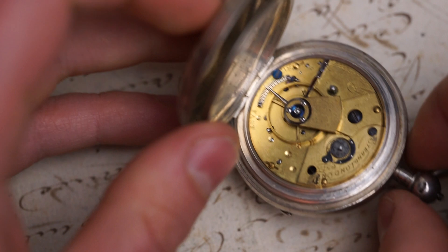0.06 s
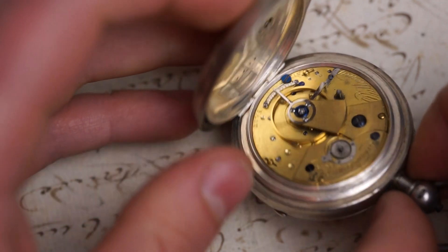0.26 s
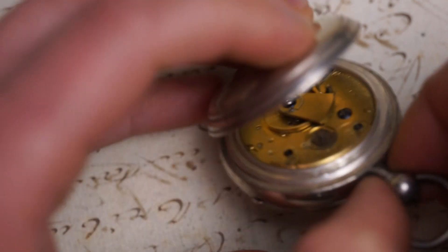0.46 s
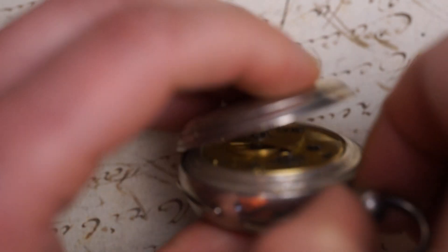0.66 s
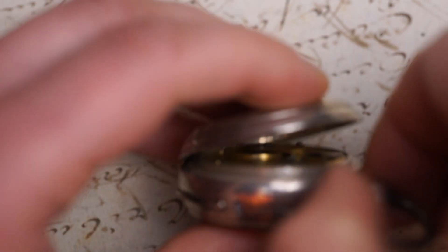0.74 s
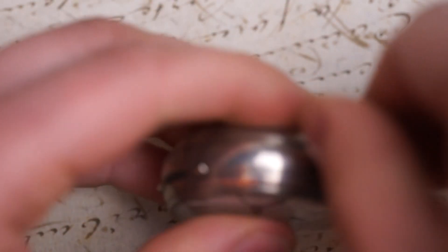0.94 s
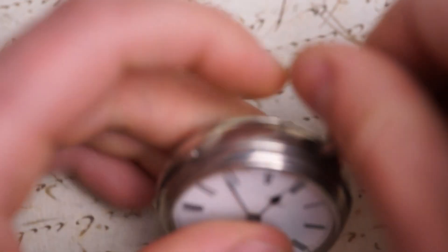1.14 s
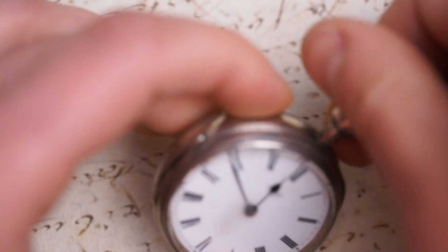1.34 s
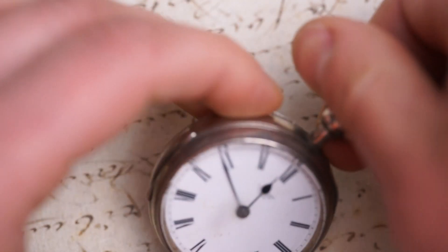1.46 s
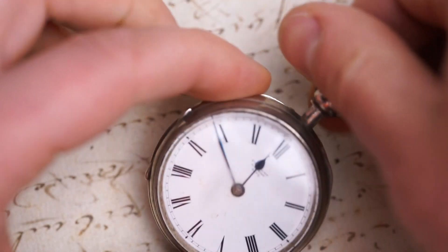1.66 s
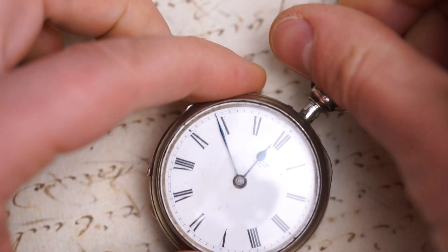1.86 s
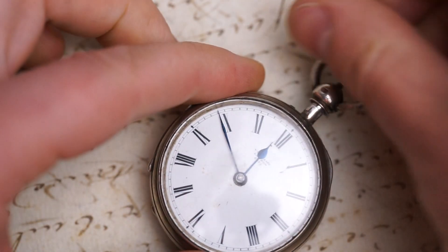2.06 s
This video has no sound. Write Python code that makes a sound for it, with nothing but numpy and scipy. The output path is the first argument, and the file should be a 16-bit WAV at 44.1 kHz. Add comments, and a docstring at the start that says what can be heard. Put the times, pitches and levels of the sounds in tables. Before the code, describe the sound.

A metal pocket watch case snaps shut sharply, then knocks and ticks softly in a quiet room

```python
"""A pocket watch lies open on a paper-covered table in a quiet room and ticks about four times a second:
each beat is a rattle of contacts that excites the resonances of the movement's plates.
Its metal case snaps once, ringing its modes, then knocks on the table as damped modes and cracks.
Fingers rub it while it is closed and turned (noise of many slips), with small dry clicks (noise bursts).
Two low tones waver under the room noise; a close pair of microphones listens."""
import sys
import numpy as np
from scipy import signal
from scipy.fft import rfft, irfft
from scipy.io import wavfile

SR = 44100
rng = np.random.default_rng(int(sys.argv[2]) if len(sys.argv) > 2 else 0)


def unload_audio(sound):
    """Save the sound as a 16-bit wav file, at the path given as the first command line argument."""
    columns = np.transpose(np.atleast_2d(sound))
    # keep every value between -1 and 1, then stretch to whole-number steps
    steps = np.round(np.clip(columns, -1, 1) * 32767)
    wavfile.write(sys.argv[1], SR, steps.astype(np.int16))


def gain_from_decibels(decibels):
    """Convert decibel values to linear amplitude factors."""
    exponent = np.asarray(decibels, float) / 20
    return 10 ** exponent


N = 92610   # samples
EDGES = np.geomspace(20, 20890, 29)   # edges of roughly third-octave bands, Hz


def rms_one(x):
    """Normalisation: scales a signal to unit root-mean-square."""
    return x / np.sqrt(np.mean(x ** 2) + 1e-20)


def at_hz(points, hz):
    """Interpolation along a logarithmic frequency axis."""
    point_hz, value = np.transpose(points)
    return np.interp(np.log(hz), np.log(point_hz), value)


def band(x, low_hz, high_hz):
    """Band-pass filtering with a Butterworth response."""
    sos = signal.butter(2, [low_hz, min(high_hz, SR / 2.1)], "band", fs=SR, output="sos")
    return signal.sosfilt(sos, x)


def coloured(white, spectrum):
    """Spectral shaping by bands: each has its own level, and neighbours use independent noise."""
    bands = []
    for k, (low, high) in enumerate(zip(EDGES, EDGES[1:])):
        bands.append(gain_from_decibels(at_hz(spectrum, np.sqrt(low * high))) * band(white[k % 2], low, high))
    return bands


def impulses(times_s, sizes):
    """Impulsive excitation: one sample per contact."""
    out = np.full(N, 1e-18)
    np.add.at(out, (np.asarray(times_s) * SR).astype(int), sizes)
    return out


def ring(times_s, sizes, hz, t60):
    """Modal resonance: impulses drive a two-pole resonator, which decays exponentially."""
    radius = gain_from_decibels(-60 / (max(t60, .002) * SR))
    angle = 2 * np.pi * hz / SR
    return signal.lfilter([.5, 0, -.5], [1, -2 * radius * np.cos(angle), radius ** 2],
                          impulses(times_s, sizes))


def dying_away(times_s, sizes, t60):
    """Exponential decay: each contact starts an envelope that falls 60 dB in t60 seconds."""
    return signal.lfilter([1], [1, -gain_from_decibels(-60 / (t60 * SR))], impulses(times_s, sizes))


def burst(start_s, level_db, hz, t60):
    """Transient noise: a band around one pitch starts at once and decays exponentially."""
    t = np.arange(N) / SR
    half_width = 2 ** 0.77   # 0.77 octaves to either side
    grit = rms_one(band(rng.standard_normal(N), hz / half_width, hz * half_width))
    return gain_from_decibels(level_db - 60 * np.maximum(t - start_s, 0) / t60) * (t >= start_s) * grit


# Slow swells of the two low tones: time_s, upper_rms_db, lower_rms_db
HUM_SWELLS = [(0.0, -80, -72), (0.1, -62, -59.5), (0.12, -62.5, -69), (0.22, -46.5, -53.5),
              (0.3, -54.5, -78), (0.33, -55.5, -58), (0.43, -72, -65), (0.47, -64, -58), (0.54, -56, -82),
              (0.61, -82, -99), (0.98, -67, -66), (1.02, -72.5, -77), (1.12, -89, -65.5),
              (1.41, -80, -63.5), (1.44, -77, -91), (1.58, -82, -80), (1.61, -105, -80), (1.69, -47, -70),
              (1.77, -79, -61), (1.88, -66, -71), (1.92, -75.5, -83), (1.95, -54, -64), (2.04, -75, -61),
              (2.1, -61, -67)]
# Nominal pitches of the upper and lower tone: pitch_hz
HUM_PITCHES = [128, 102]


def hum():
    """Narrow-band phase modulation blurs two low tones, which swell and fade independently."""
    wander_width_hz, wander_rms_rad = 2.44, 1.23
    time_s, *levels_db = np.transpose(HUM_SWELLS)
    t = np.arange(N) / SR
    pole = np.exp(-np.pi * wander_width_hz / SR)
    out = 0
    for hz, level_db in zip(HUM_PITCHES, levels_db):
        # two equal poles smooth the noise; its first half lets them settle
        wander = signal.lfilter([1], [1, -2 * pole, pole * pole], rng.standard_normal(2 * N))[N:]
        tone = np.sin(2 * np.pi * hz * t + wander_rms_rad * rms_one(wander))
        out = out + np.sqrt(2) * gain_from_decibels(np.interp(t, time_s, level_db)) * tone
    return out


# Spectrum of the room and microphone noise: frequency_hz, relative_density_db (dB per Hz)
AIR_SPECTRUM = [(18, -37), (30, -7), (109, -4), (162, -9), (254, -8.5), (331, -9.5), (408, -12.5),
                (855, -18), (1030, -18), (1370, -20.5), (5420, -23.5), (12600, -26), (15200, -28),
                (18000, -26.5)]
# Left-right correlation of that noise: frequency_hz, correlation (1 = alike)
AIR_LIKENESS = [(60, 0.98), (180, 0.96), (550, 0.46), (1650, 0.086), (4970, 0.07), (15000, 0.068)]


def air():
    """Partial coherence: mid and side noises, weighted by band, set how alike left and right are."""
    bands = coloured(rng.standard_normal((2, 2, N + SR // 2)), AIR_SPECTRUM)
    alike = np.clip(at_hz(AIR_LIKENESS, np.sqrt(EDGES[1:] * EDGES[:-1])), -1, 1)
    out = 0
    for likeness, (mid, side) in zip(alike, bands):
        common = np.sqrt(1 + likeness) * mid[-N:]
        opposed = np.sqrt(1 - likeness) * side[-N:] * [[1], [-1]]
        out = out + common + opposed
    return gain_from_decibels(-57) * rms_one(out)


# Skin slides over metal: start_s, rise_s, fall_t60_s, level_db, centre_hz
RUB_SLIDES = [(.06, 0.075, 0.33, -63, 2140), (0.487, 0.027, 0.34, -57, 2000),
              (1.128, 0.066, 0.22, -52.5, 4100), (1.13, 0.057, 0.25, -54, 10500)]


def rubs():
    """Stick-slip friction: dense uneven slips in a broad band swell, then decay exponentially."""
    slips_per_s, slip_spread_db, half_width_octaves = 8000, 2, 1
    t, out = np.arange(N) / SR, 0
    for start_s, rise_s, t60, level_db, hz in RUB_SLIDES:
        happens = rng.random((2, N)) < slips_per_s / SR
        direction = rng.choice([-1, 1], (2, N))
        sizes = gain_from_decibels(slip_spread_db * np.minimum(rng.exponential(1, (2, N)), 4))
        slips = happens * direction * sizes
        shared = slips + 0.28 * slips[::-1]   # some of each side reaches the other
        noise = band(shared, hz / 2 ** half_width_octaves, hz * 2 ** half_width_octaves)
        rise = np.clip((t - start_s) / rise_s, 0, 1)
        fall = gain_from_decibels(-60 * np.maximum(t - start_s - rise_s, 0) / t60)
        out = out + gain_from_decibels(level_db) * rise * fall * rms_one(noise)
    return out


# Reverberation time of the room: frequency_hz, t60_s
ROOM_DECAY = [(500, 0.54), (1500, 0.23), (3000, 0.26), (8000, 0.34), (15000, 0.26)]


def room(x):
    """Diffuse reverberation: convolution with noise that decays band by band, its own on each side."""
    level_db, tail_rise_s = -7, 0.0025
    t, tail = np.arange(SR // 2) / SR, 0
    white = rng.standard_normal((2, 2, len(t)))
    for k, (low, high) in enumerate(zip(EDGES[9::2], EDGES[11::2])):
        decay = gain_from_decibels(-60 * t / at_hz(ROOM_DECAY, np.sqrt(low * high)))
        tail = tail + band(white[k % 2], low, high) * decay
    tail = tail * np.clip(t / tail_rise_s, 0, 1) ** 2
    tail = tail / np.sqrt(np.sum(tail ** 2) / 2)   # unit energy per side on average
    return gain_from_decibels(level_db) * signal.fftconvolve(x[None], tail, axes=1)[:, :N]


# Small dry clicks of the handled case: start_s, level_db, centre_hz
CASE_CLICKS = [(.0972, -58.5, 7800), (.3775, -52.5, 5840), (.4200, -59, 5900), (.4788, -51.5, 7840),
               (.7502, -55, 9000), (.7706, -54, 9900), (.8964, -59, 10000), (1.2655, -56, 10060),
               (1.4785, -55.5, 7600), (1.5638, -60, 13700), (1.7639, -56.5, 10400), (1.8961, -62, 5500),
               (1.9220, -56, 4750), (1.9650, -57.5, 13000)]


def clicks():
    """Transient noise: each click is a short burst around its own pitch."""
    return sum(burst(start_s, level_db, hz, t60=0.05) for start_s, level_db, hz in CASE_CLICKS)


# Escapement beats: start_s, level_db (added to the plate and grit levels)
TICK_BEATS = [(0.161, -61.5), (.4020, -61), (.6570, -57.5), (.9103, -61.5), (1.4207, -61.5),
              (1.6932, -61.5), (1.9285, -65)]
# Modes of the movement's plates: pitch_hz, relative_level_db, t60_s
PLATE_MODES = [(4360, -15, .3), (5350, -12.5, .12), (7000, -4.5, .04), (7760, -2.5, 0.05),
               (8880, -10.5, .3), (9620, -5.5, .08), (10400, -6, 0.054), (10930, -5, .1),
               (11080, -6.5, 0.11), (11800, -13, 0.21), (12500, -8, .06), (13100, -11, .06)]


def ticks():
    """Modal excitation: each beat is a fading, gritty rattle of four contacts that rings the plates."""
    rattle_s, fade_db, spread_db = 0.022, 8.5, 3
    start_s, beat_db = np.transpose(TICK_BEATS)
    order = np.linspace(0, 1, 4)   # first to last contact
    times_s = start_s[:, None] + rattle_s * rng.random((len(start_s), 4)) * order
    chance_db = rng.normal(0, spread_db, (len(start_s), 4, len(PLATE_MODES)))
    out = np.zeros(N)
    for k, (hz, mode_db, t60) in enumerate(PLATE_MODES):
        contact_db = beat_db[:, None] + mode_db - fade_db * order + chance_db[..., k]
        out += ring(times_s, gain_from_decibels(contact_db) * (-1) ** k, hz, t60)
    for at_s, level_db in TICK_BEATS:
        out += burst(at_s, level_db + 4, hz=9600, t60=.09)
    return out


# Contacts of the snap: start_s, level_db (added to the mode levels)
SNAP_CONTACTS = [(.2035, -16), (.2038, -12.5), (.2042, -17), (.2046, -17), (0.2078, -28)]
# Modes of the open case: pitch_hz, relative_level_db, t60_s
OPEN_CASE_MODES = [(1070, -30.5, 0.033), (1490, -28, .02), (1824, -26, 0.084), (2208, 0, 0.012),
                   (2934, -7.5, 0.0095), (3030, -11, 0.029), (3215, -12.5, 0.031), (3550, -16.5, 0.014),
                   (4446, -8, 0.012), (4840, -13, 0.02), (4990, -16, 0.03), (5460, -13.5, 0.028),
                   (6800, -19, 0.041), (7220, -16.5, 0.02), (7850, -16, .02), (8230, -11, .015),
                   (8560, -8, 0.071), (9450, -20, .015), (10100, -25, 0.011), (11260, -35, 0.02),
                   (11680, -40, 0.024), (12830, -15.5, 0.012), (12900, -19, 0.006), (15800, -25, 0.0107),
                   (14700, -23, .012)]
# Spectrum of the snap's broad grit: frequency_hz, relative_density_db (dB per Hz)
SNAP_GRIT_SPECTRUM = [(530, -51), (900, -27.5), (2320, 7), (3770, -10), (5000, 7.5), (6130, -14.5),
                      (7200, 5.5), (11700, -6), (13200, -2.5), (16400, -4.5)]


def snap():
    """Modal excitation and stereo delay: quick gritty contacts ring the case; the right leads, louder."""
    grit_db, grit_t60_s = -23, 0.018
    hollow_hz, hollow_q = 3850, 5.0
    right_lag_s, in_step_above_hz, left_over_right_db = -0.000031, 12500, -4
    start_s, contact_db = np.transpose(SNAP_CONTACTS)
    x = np.zeros(N)
    for k, (hz, mode_db, t60) in enumerate(OPEN_CASE_MODES):
        x += ring(start_s, gain_from_decibels(contact_db + mode_db) * (-1) ** k, hz, t60)
    envelope = dying_away(start_s, gain_from_decibels(contact_db - contact_db.max()), grit_t60_s)
    grit = rms_one(sum(coloured(rng.standard_normal((2, N)), SNAP_GRIT_SPECTRUM)))
    x = x + gain_from_decibels(grit_db) * envelope * grit
    left = signal.lfilter(*signal.iirnotch(hollow_hz, hollow_q, SR), x)
    hz = np.arange(N // 2 + 1) * SR / N
    lag_s = right_lag_s / (1 + (hz / in_step_above_hz) ** 10)   # vanishes at the top
    right = irfft(rfft(left) * np.exp(-2j * np.pi * hz * lag_s), N)
    return np.array([left, right]) * gain_from_decibels([[left_over_right_db / 2], [-left_over_right_db / 2]])


# The held case meets table or lid: start_s, level_db (added to the mode levels), centre_hz,
# width_octaves (distance from the centre at which a mode is 10 dB weaker), left_over_right_db
CASE_KNOCKS = [(.5160, -58, 2000, 1.3, -5), (.5444, -65, 3000, 1.4, -4), (.6490, -53, 1800, 0.67, -6),
               (.6565, -39.5, 1960, 1.48, 2), (.9563, -45, 2500, 6.5, 0), (1.1375, -57, 1000, 1.7, 1),
               (1.1860, -51.5, 7000, .7, -5), (1.2983, -60, 2190, 1.56, -7), (1.947, -49.5, 2040, 1.03, 0),
               (2.0440, -58.5, 1700, 1.6, -1)]
# Modes of the damped case on the table: pitch_hz, relative_level_db, t60_s
HELD_CASE_MODES = [(325, 7, 0.018), (554, 4.5, 0.018), (780, 2, 0.026), (1077, 1.5, 0.027),
                   (1300, -1, 0.022), (1545, 2, 0.028), (1850, -1, 0.019), (1960, -2.5, 0.016),
                   (2315, -0.5, 0.013), (3310, 1.5, 0.0046), (4550, 1, 0.003), (5320, 4.5, 0.019),
                   (7000, 0, 0.0022), (8300, 0, 0.018), (9600, -2.5, 0.0045), (12700, -6, 0.0037),
                   (15370, -12, 0.0054)]


def knocks():
    """Damped modal excitation: three close contacts and a gritty crack, strongest around one pitch."""
    contacts_s, spread_db = .004, 2
    crack_db, crack_t60_s, crack_width = 5.5, 0.046, 1.2   # width: ratio of band edge to pitch
    start_s, knock_db, centre_hz, octaves, pan_db = np.transpose(CASE_KNOCKS)
    times_s = start_s[:, None] + contacts_s * rng.random((len(start_s), 3)) * [0, .5, 1]
    chance_db = rng.normal(0, spread_db, (len(start_s), 3, len(HELD_CASE_MODES)))
    grit = rng.standard_normal((2, N))
    out = np.zeros((2, N))
    for k, (hz, mode_db, t60) in enumerate(HELD_CASE_MODES):
        sizes = gain_from_decibels(knock_db + mode_db - 10 * (np.log2(hz / centre_hz) / octaves) ** 2)
        contact_gain = gain_from_decibels(chance_db[..., k] + [-5, -1, -4])
        for side in (0, 1):
            heard = sizes * gain_from_decibels(pan_db * (.5 - side))
            out[side] += ring(times_s, heard[:, None] * contact_gain * (-1) ** k, hz, t60)
            crack = dying_away(start_s, heard, crack_t60_s) * grit[k % 2]
            out[side] += gain_from_decibels(crack_db) * band(crack, hz / crack_width, hz * crack_width)
    return out


def scene():
    """Superposition: the watch and its reverberation add to the low tones and room noise."""
    watch = snap() + knocks() + ticks() + clicks() + rubs()
    return watch + room(watch.mean(axis=0)) + hum() + air()


def band_limit(x):
    """A steep low-pass at the top of the band."""
    return signal.sosfilt(signal.butter(12, 15850, fs=SR, output="sos"), x)


def record(dry):
    """Linear pick-up: the finished mix is taken at its own level."""
    return band_limit(dry)


dry = scene()
out = record(dry)
unload_audio(out)
```